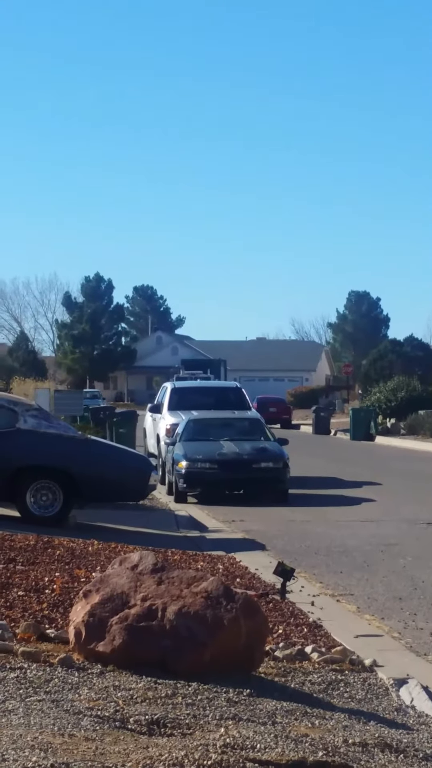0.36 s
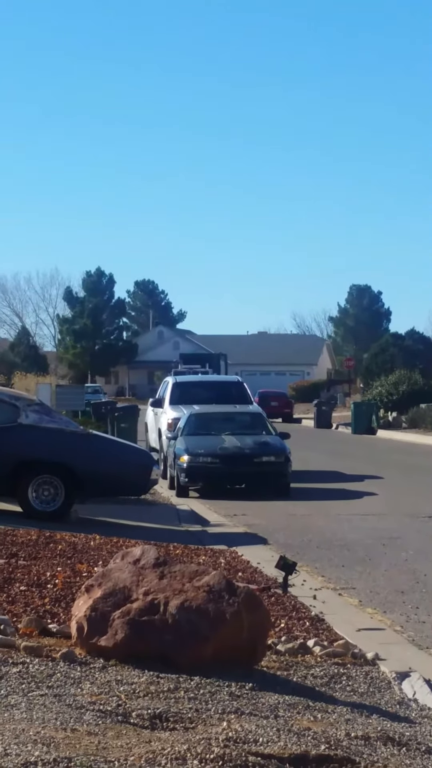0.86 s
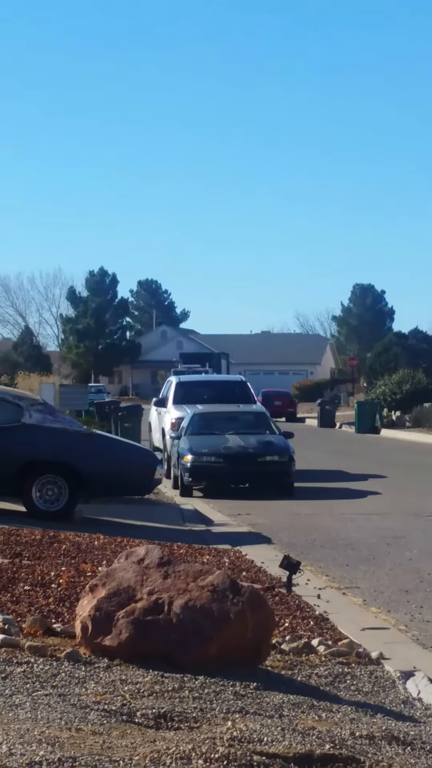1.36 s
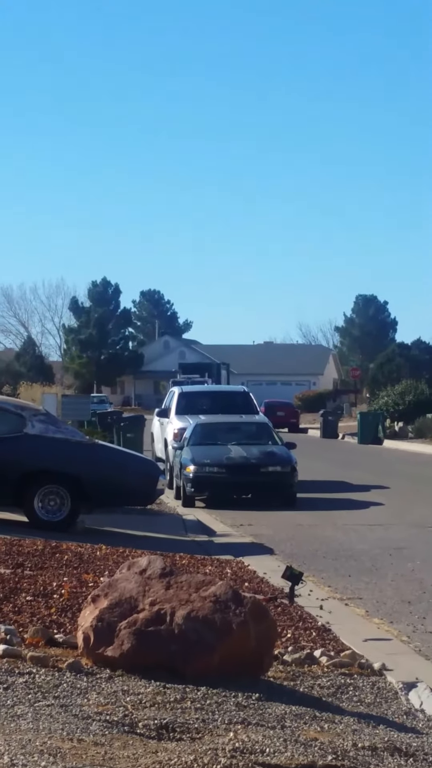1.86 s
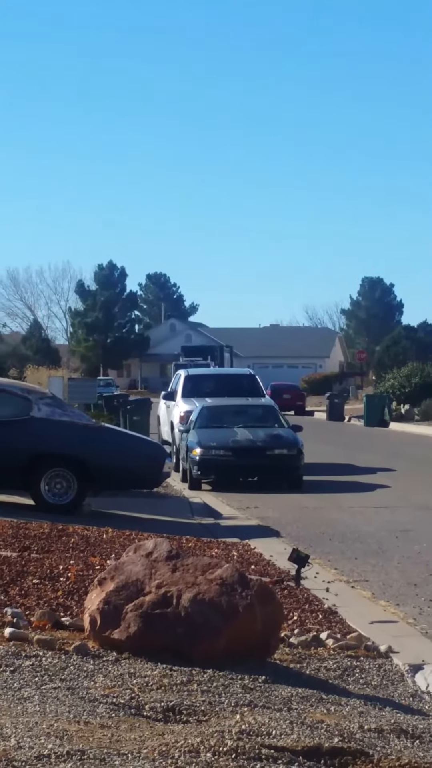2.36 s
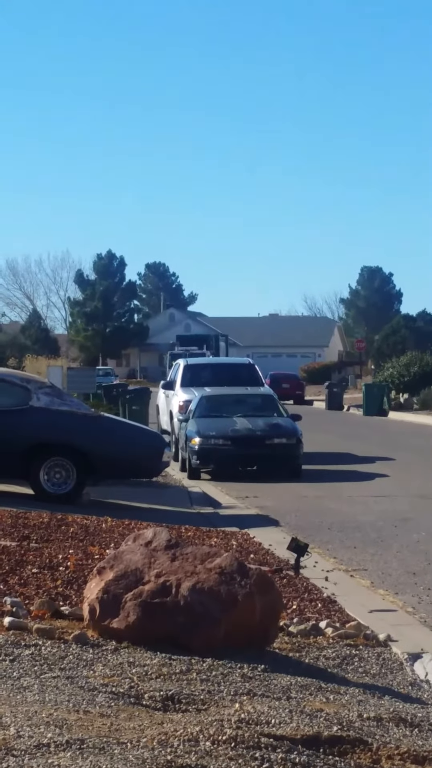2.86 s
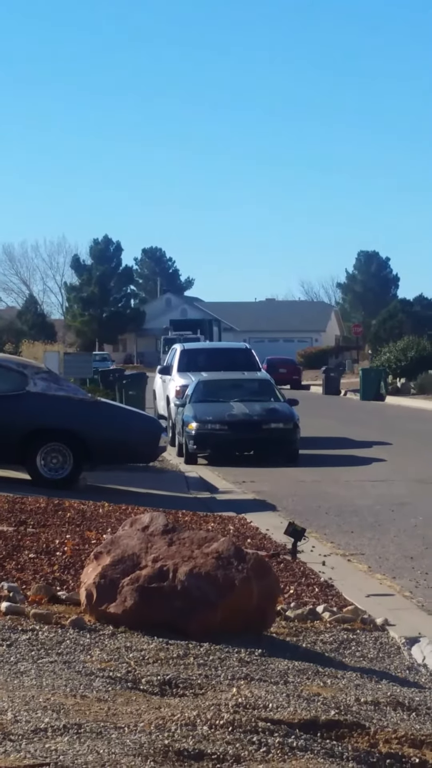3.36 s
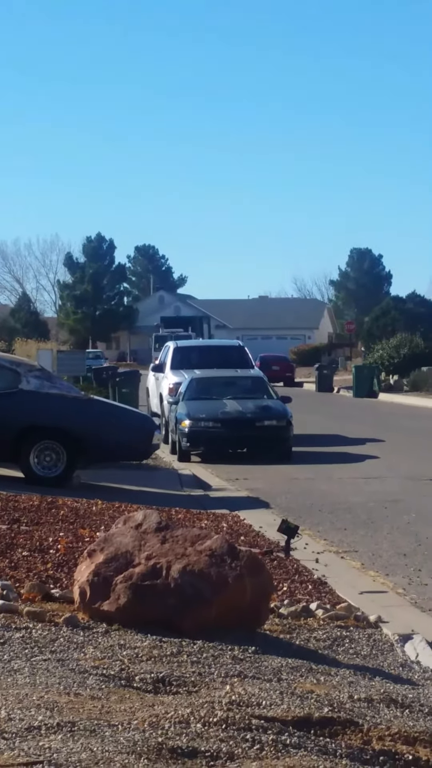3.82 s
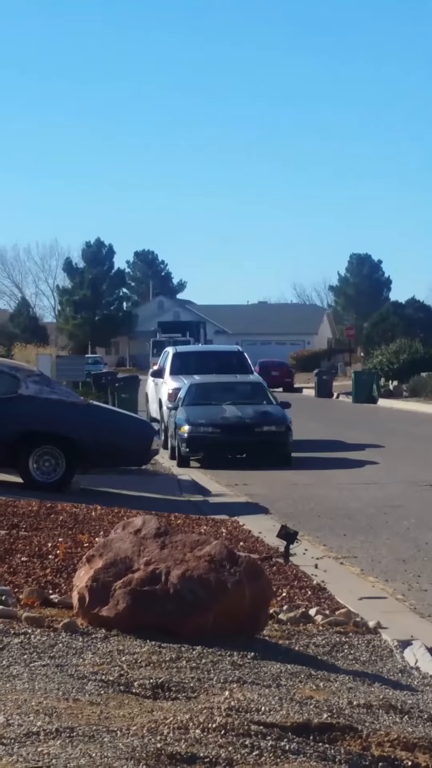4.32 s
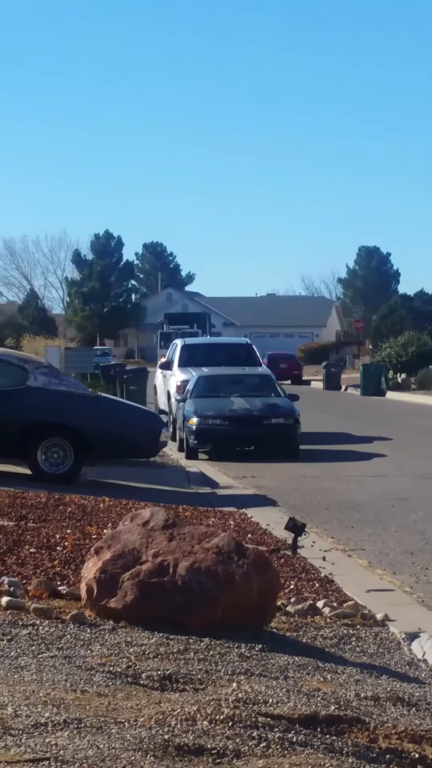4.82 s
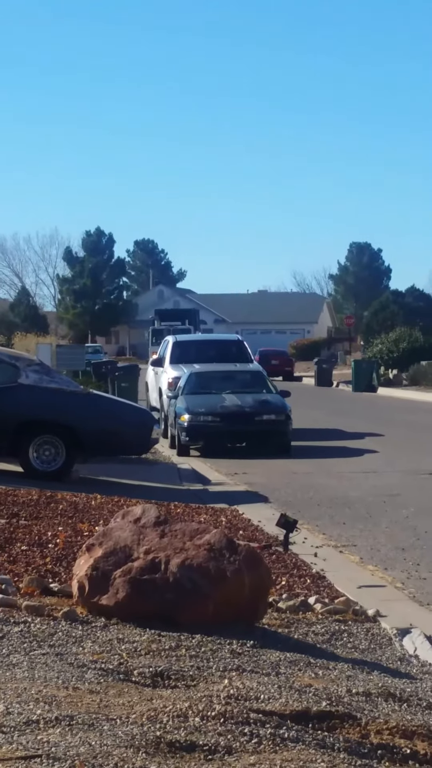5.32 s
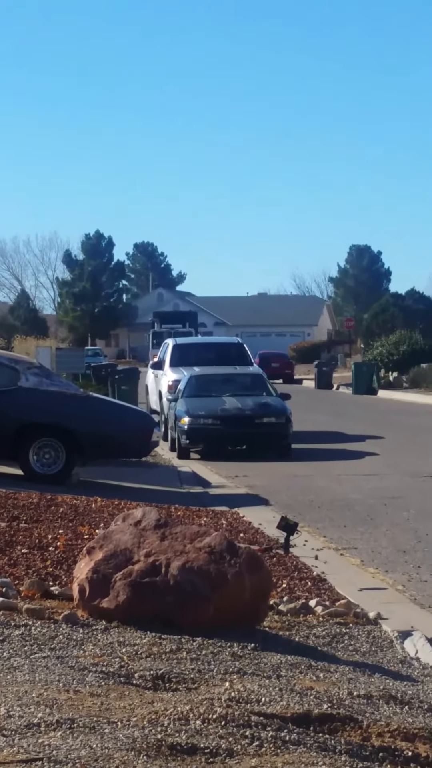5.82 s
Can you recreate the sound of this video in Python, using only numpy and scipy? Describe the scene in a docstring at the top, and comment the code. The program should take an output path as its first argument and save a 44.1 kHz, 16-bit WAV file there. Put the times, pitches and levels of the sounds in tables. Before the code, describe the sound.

Far-off diesel engine climbs from a low growl to a loud whining roar over five seconds, then drops back, with breeze buffeting the microphone.

```python
"""A heavy diesel truck revs up far down a residential street, over a low hum that soon dies away; then it eases off.
Gliding sines make its firing note and the gear-pump whine that follows the engine; shaped noise makes its roar.
A turbo adds thin whistles and a breathy whoosh. A light breeze, as low noise and short thumps, buffets the two
ports of a handheld microphone, whose left capsule hisses around 4 kHz; two faint ticks sound at the left."""
import sys
import numpy as np
from scipy import signal
from scipy.io import wavfile
from scipy.ndimage import uniform_filter1d

SR = 44100
rng = np.random.default_rng(int(sys.argv[2]) if len(sys.argv) > 2 else 0)


def unload_audio(sound):
    """Save the sound as a 16-bit wav file, at the path given as the first command line argument."""
    columns = np.transpose(np.atleast_2d(sound))
    # keep every value between -1 and 1, then stretch to whole-number steps
    steps = np.round(np.clip(columns, -1, 1) * 32767)
    wavfile.write(sys.argv[1], SR, steps.astype(np.int16))


def nominal_scale(level):
    """Amplitude ratio for a level in decibels (scalar or array-like)."""
    x = np.asarray(level, float) / 20
    return 10 ** x


N = 261954

# colour of the microphone hiss, mid and treble: (frequency [Hz], relative density [dB])
CAPSULE = [(1180, -53), (2000, -27.5), (2450, -19), (2970, -14.5), (3210, -13), (3710, -14), (3890, -4.5),
           (4260, -2.5), (4730, -10.5), (5250, -22.5), (6150, -33), (6740, -40.5), (10500, -33.5),
           (13600, -64), (22000, -120)]
TREBLE = [(8000, -46), (9500, -27.5), (10200, -13), (11300, -2.5), (12300, 4), (13800, 0), (15000, 2.5),
          (15500, 9), (15800, 3), (16000, -62)]
# lean of the capsule hiss to the left: (frequency [Hz], left minus right [dB])
CAPSULE_LEFT = [(1800, -3), (2740, 5), (3300, 13), (3900, 22), (4400, 23), (5500, 16), (7000, 3),
                (9800, -2)]
# faint ticks at the left port: (time [s], level [dB])
TICKS = [(.876, -43.5), (4.0, -54)]
# colour of the wind buffeting: (frequency [Hz], relative density [dB])
BUFFET = [(10, -6.5), (30, -0.5), (60, 2), (100, 11), (200, -22.5), (400, -52.5)]
# swells of the breeze: (time [s], half length [s], level [dB])
GUSTS = [(3.05, 0.45, -55), (3.669, .08, -48.5), (3.918, .14, -44), (4.496, 0.39, -56),
         (5.183, 0.35, -54.5)]
# eddies that thump one port: (time [s], level [dB], pitch [Hz], port [0 left, 1 right])
THUMPS = [(2.351, -35, 70.8, 0), (2.962, -30, 50, 0), (3.669, -29, 54.28, 0), (3.884, -16.5, 74.4, 0),
          (3.893, -16.5, 150, 1), (3.904, -21.5, 97, 1), (3.923, -19, 65.6, 0), (4.04, -16, 79, 0),
          (4.102, -14, 95.9, 1), (4.16, -21, 93.9, 0), (4.161, -19, 101, 1), (4.28, -28, 60, 1),
          (4.349, -25, 70, 1), (5.22, -36, 70, 1), (5.27, -28, 55.84, 0)]
# low hum at the start: (time [s], frequency [Hz], level [dB])
HUM = [(0, 237, -50), (.25, 230, -56), (.5, 226, -54), (.7, 224, -75)]
# turbo whistles: (start [s], length [s], first pitch [Hz], last pitch [Hz], level at full swell [dB])
TURBO = [(2.9, .8, 7100, 7800, -96), (3.72, .68, 7380, 8120, -87), (4.86, .68, 8815, 8810, -92),
         (5.52, .55, 8760, 8980, -91)]
# colour of the roar, low rumble and mechanical clatter: (frequency [Hz], relative density [dB])
RUMBLE = [(15, -36.5), (25, -6), (43, -10), (59, -1), (77, -4.5), (102, -3.5), (124, -5.5), (193, -6.5),
          (270, -6.5), (312, -8.5), (389, -15), (525, -36.5), (560, -33.5), (730, -48.5), (1230, -120)]
CLATTER = [(290, -32.5), (500, -1.5), (530, -5.5), (654, -1.5), (754, 0.5), (826, 0.5), (994, -4.5),
           (1170, -2), (1370, -9), (1930, -9), (2310, -12), (2670, -19.5), (3100, -24), (3580, -28),
           (3700, -28), (4810, -50.5), (8140, -120)]
# the truck's balance between the ports: (frequency [Hz], left minus right [dB])
TRUCK_LEFT = [(30, -2), (100, -1.5), (250, -1.5), (450, -5.5), (590, 5.5), (720, 1.5), (980, -4),
              (1300, 6.5), (1550, 0), (1780, -4.5), (2030, -2.5), (2400, -8.5), (2700, -4.5), (3500, 1),
              (4200, 22.5), (6000, 11.5), (7500, 9.5)]
# likeness of the roar at the two ports: (frequency [Hz], likeness [0 to 1])
TRUCK_SAME = [(30, .9), (100, 1), (270, 1), (500, 0.74), (1000, 0.98), (2000, 0.65), (3500, 1)]
# phase by which the left port leads: (frequency [Hz], lead [rad])
TRUCK_LEAD = [(60, -.05), (300, 0.35), (450, -.2), (600, 0.87), (860, -1.1), (1210, 1.99), (1500, .2),
              (2500, 1.37)]
# engine speed: (time [s], firing rate [firings per s])
SPEED = [(0.0, 36.24), (0.4, 37.81), (0.73, 39.28), (0.94, 43.65), (1.16, 46.2), (1.4, 48.47), (1.65, 50.8),
         (1.92, 53.66), (2.17, 55.88), (2.63, 59.4), (2.82, 61.1), (3.17, 66.03), (3.52, 71.1), (3.7, 73.2),
         (3.97, 75.26), (4.38, 79.92), (4.7, 83.4), (4.83, 83.63), (5.04, 75.24), (5.14, 71.13),
         (5.26, 69.1), (5.38, 67.57), (5.56, 66.8), (5.79, 67.74), (5.94, 67.8)]
# how hard the engine works and how openly it is heard: (time [s], load [dB], brightness [dB per octave])
EFFORT = [(0., 2.2, -6), (.4, 1.3, -7.5), (.75, 0.5, -6.5), (1.1, 1.2, -5), (1.4, 1.5, -3), (1.9, 1.4, -3),
          (2.3, .2, 1), (2.7, 0.8, 0), (3.2, -.7, 0.1), (3.6, -1.1, 1.3), (4.0, -1.1, 1.1),
          (4.4, -0.9, 2.2), (4.85, -0.9, 2), (5.1, -0.6, 1.2), (5.35, -0.35, -0.7), (5.94, 0.1, -5.5)]
# hydraulic pressure, which sets the strength of the whine: (time [s], level [dB])
PRESSURE = [(0., -9), (.45, -1.5), (1.0, .5), (1.9, 2), (2.8, 1.5), (3.5, .5), (3.9, 0), (4.5, 2),
            (4.85, 0.5), (5.1, 7), (5.4, -1), (5.94, -1.5)]
# pump multiples 1 to 8: (level at middle speed [dB], extra level [dB per octave of speed])
PUMP_MULTIPLES_DB = [(2, -5), (-15.5, 4.5), (-16, 2.5), (-20, 7.5), (-17.5, 3.5), (-25, 4), (-31, 0),
                     (-35, 4.5)]
# resonances that lift a pump tone gliding through them: (centre [Hz], width [Hz], lift [dB])
HOUSING = [(208, 22, 10.7), (233.2, 24, 11.4), (261.3, 24, 12.7), (297.8, 23, 5.5), (325.3, 45.5, 14),
           (354.4, 15, 7.5), (391.7, 13.6, 8.5), (456, 10, 3.3), (685, 55, 7.9), (754, 46, 11.2),
           (883, 140, 11.5), (1041, 59, 7.1), (1124, 48, 11), (1228, 51, 11), (1393, 62, 9.9),
           (1610, 66, 6), (1759.5, 130, 8.8), (1945, 130, 5.8), (2099, 74, 7.3), (2351, 160, 12.2),
           (2523, 100, 8.7), (2776, 80, 5.9)]
# how strongly the exhaust note comes through the roar: (time [s], level [dB])
BOOM = [(0., -0.5), (.6, 0), (1.2, 0), (2.0, 0.5), (2.7, 0.5), (3.0, -4), (3.4, 0.5), (3.7, -2), (3.85, 2),
        (4.0, -3), (4.3, 2), (4.75, -8.5), (5.04, 1.), (5.15, -4.5), (5.3, -2.5), (5.6, -2.5), (5.94, 3)]
# exhaust multiples: (level at middle speed [dB], extra level [dB per octave of speed])
EXHAUST_MULTIPLES_DB = [(-1, 2), (-12, -9), (-18.5, -9), (-21.5, -7.5)]
# resonances that lift an exhaust tone: (centre [Hz], width [Hz], lift [dB])
PIPE = [(46.6, 4, 1), (62, 6.1, 5), (67.9, 7.5, 6.5), (85.4, 12, 6.5), (121.5, 5.8, 9), (131.6, 13, 9),
        (141.8, 6, 13.5), (165.1, 20, 11.5), (186.3, 11, 12.5), (204, 8, 7.5), (213.5, 20, 8.5),
        (236, 40, 11.5), (273.7, 40, 22)]

# laws of engine speed: (value at middle speed, change per octave of speed, bend per octave squared)
MIDDLE_FIRINGS_PER_S = 60
CAPSULE_DB, TREBLE_DB = (-68, 0.7, -5), (-75.5, 2, -6.5)
RUMBLE_DB, CLATTER_DB = (-40.5, 12.5, -3.5), (-55.5, 15.5, 1.7)
RUMBLE_TILT_DB = (2.1, 3, 2.5)  # dB per octave of pitch
EXHAUST_DB, PUMP_DB = (-41, 8, -0.8), (-56.5, 11.5, 0.6)

EXHAUST_MULTIPLES = (1, 2, 3, 10 / 3)  # of the firing rate
TEETH_PER_FIRING = 5.27
OVERRUN_DB = -0.1178  # change of the fourth pump multiple per firing per s that the engine slows each second
WHISTLE_SWELL_DB, WHISTLE_PEAK_LATE = 11, 1.5  # exponent above 1: the peak falls past the middle
WHOOSH_DB, WHOOSH_PEAK_DB, WHOOSH_S, WHOOSH_WIDTH_S = -99.5, -85.5, 3.3, 0.6
TREBLE_BOOST_DB = 2.1  # the treble hiss swells with the turbo whoosh
CALM_DB = -62.5  # breeze between gusts

SIZE, HOP = 2048, 512  # short-time spectra [samples]
HZ = np.fft.rfftfreq(SIZE, 1 / SR)
FRAME_S = np.arange(N // HOP + 4) * HOP / SR


def read(points, hz):
    """Reads a spectrum table on a log-frequency axis."""
    f, value = np.transpose(points)
    return np.interp(np.log(hz + 1), np.log(f + 1), value)


def curves(rows, t):
    """The columns of a table at times t."""
    s, *columns = np.transpose(rows)
    return [np.interp(t, s, c) for c in columns]


def law(terms, t):
    """A value that follows engine speed."""
    octaves = np.log2(curves(SPEED, t)[0] / MIDDLE_FIRINGS_PER_S)
    return np.polyval(terms[::-1], octaves)


def lift(resonances, hz):
    """The dB that resonances add at a frequency."""
    return sum(db * np.exp(-(2 * (hz - centre_hz) / width) ** 2) for centre_hz, width, db in resonances)


def boost():
    """The rise and fall of turbo boost, 0 to 1."""
    return np.exp(-((FRAME_S - WHOOSH_S) / WHOOSH_WIDTH_S) ** 2)


def ports(left_db):
    """Gains of the two ports for a left-right level gap."""
    return nominal_scale(np.array([left_db / 2, -left_db / 2]))


def wobble(per_s):
    """Slow chance of rms 1."""
    length = int(SR / per_s)
    x = uniform_filter1d(uniform_filter1d(rng.standard_normal(N), length), length)
    return x / x.std()


def noise(shape_db, level_db, left_db=0 * HZ, same=0 * HZ, lead=0 * HZ, patchy_db=0.):
    """Random short-time spectra of a given shape, level in time and likeness between the ports."""
    a, b, c, d, patches = rng.standard_normal((len(FRAME_S), len(HZ), 5)).T
    patches = uniform_filter1d(uniform_filter1d(patches, size=8, axis=0), size=8, axis=1) * 8
    shape = nominal_scale(shape_db) * np.ones(a.shape)
    shape *= nominal_scale(level_db) / np.sqrt((shape ** 2).sum(0) * 2 / 3)
    same = np.clip(same, 0, 1)[:, None]
    left, other = a + 1j * b, c + 1j * d
    right = same * left + np.sqrt(1 - same ** 2) * other
    z = np.array([left * np.exp(1j * lead)[:, None], right])
    z *= shape * nominal_scale(patchy_db * patches) * ports(left_db)[:, :, None]
    return signal.istft(z, nperseg=SIZE, noverlap=SIZE - HOP)[1][:, :N]


def tone(hz, db, flutter_db, drift):
    """A gliding sine that wavers on its way down the street, as each port receives it."""
    angle = 2 * np.pi * (np.cumsum(hz) / SR + rng.random()) + drift * wobble(16)
    waves = np.sin([angle + read(TRUCK_LEAD, hz), angle])
    level = np.sqrt(2) * nominal_scale(db + flutter_db * wobble(30.0))
    return level * ports(read(TRUCK_LEFT, hz)) * waves


def capsule_hiss():
    """A hiss, peaked at the left port and in the treble, that rises a few dB with the revs."""
    # the treble also swells with the boost
    treble_db = law(TREBLE_DB, FRAME_S) + TREBLE_BOOST_DB * boost()
    mid = noise(read(CAPSULE, HZ)[:, None], law(CAPSULE_DB, FRAME_S), read(CAPSULE_LEFT, HZ), patchy_db=1.14)
    treble = noise(read(TREBLE, HZ)[:, None], treble_db, -1.1 + 0 * HZ, patchy_db=1.0)
    return mid + treble


def ticks(t):
    """Faint single ticks, coloured by the resonance of the left port."""
    out = np.zeros((2, N))
    for s, db in TICKS:
        u = np.clip(t - s, 0, 1)
        ring = np.sin(2 * np.pi * 4200 * u)
        ring += .3 * np.sin(2 * np.pi * 3400 * u)
        ring += .08 * np.sin(2 * np.pi * 13000 * u)
        out[0] += nominal_scale(db) * np.exp(-u / .0008) * ring
    return out


def wind(t):
    """Unrelated low buffeting at each port that swells in gusts, and single eddies that thump one port."""
    gusts = sum(nominal_scale(db) * np.exp(-((FRAME_S - s) / half) ** 2) for s, half, db in GUSTS)
    breeze = nominal_scale(CALM_DB) + gusts
    out = noise(read(BUFFET, HZ)[:, None], 20 * np.log10(breeze), patchy_db=2.8)
    for s, db, hz, port in THUMPS:
        u = (t - s) * hz
        out[round(port)] += nominal_scale(db) * np.exp(-(1.78 * u) ** 2) * np.sin(-2 * np.pi * u + 0.27)
    return out


def idle_hum(t):
    """A low hum, one gliding sine, that dies away as the revs start to climb."""
    return tone(*curves(HUM, t), flutter_db=2.0, drift=0.13)


def turbo(t):
    """A thin high whistle that comes and goes, over a breathy whoosh while the boost builds."""
    whoosh = -((HZ - 6000) / 500) ** 2
    whoosh_db = WHOOSH_DB + (WHOOSH_PEAK_DB - WHOOSH_DB) * boost()
    out = noise(whoosh[:, None], whoosh_db, 6.1 + 0 * HZ, patchy_db=4.0)
    for start, length, first_hz, last_hz, db in TURBO:
        u = np.clip((t - start) / length, 0, 1)
        swell_db = WHISTLE_SWELL_DB * (np.sin(np.pi * u ** WHISTLE_PEAK_LATE) - 1)
        sounding = uniform_filter1d(1. * (u > 0) * (u < 1), size=2000)
        hz = first_hz + (last_hz - first_hz) * u + 40 * wobble(200)
        out += sounding * tone(hz, db + swell_db, flutter_db=.5, drift=1.3)
    return out


def throb(t, depth=0.092):
    """Each firing jolts the drive, so pump and roar pulse at the firing rate."""
    return 1 + depth * np.cos(2 * np.pi * np.cumsum(curves(SPEED, t)[0]) / SR)


def roar():
    """Broadband engine noise: low rumble and mechanical clatter, tilted by engine speed and openness."""
    load_db, bright_db = curves(EFFORT, FRAME_S)
    pair = read(TRUCK_LEFT, HZ), read(TRUCK_SAME, HZ), read(TRUCK_LEAD, HZ)
    low_octaves = np.log2(np.clip(HZ, 150, 600) / 200)[:, None]
    high_octaves = np.log2(np.clip(HZ, 400, 4000) / 1200)[:, None]
    low = read(RUMBLE, HZ)[:, None] + law(RUMBLE_TILT_DB, FRAME_S) * low_octaves
    bright = read(CLATTER, HZ)[:, None] + bright_db * high_octaves
    rumble = noise(low, law(RUMBLE_DB, FRAME_S) + load_db, *pair, patchy_db=1.12)
    clatter = noise(bright, law(CLATTER_DB, FRAME_S) + load_db, *pair, patchy_db=1.0)
    return rumble + clatter


def pump(t):
    """Gear teeth mesh in step with the engine; multiples swell at resonances, upper ones dull as revs fall."""
    firing_hz = curves(SPEED, t)[0]
    hz, pressure_db = TEETH_PER_FIRING * firing_hz, curves(PRESSURE, t)[0]
    slowing = np.maximum(-uniform_filter1d(np.gradient(firing_hz) * SR, size=4000), 0)
    out = np.zeros((2, N))
    for k, terms in enumerate(PUMP_MULTIPLES_DB, 1):
        level_db = law(PUMP_DB, t) + law(terms, t) + pressure_db + lift(HOUSING, k * hz)
        level_db += OVERRUN_DB * slowing * np.log2(k) / 2
        out += tone(k * hz, level_db, flutter_db=2.37, drift=.15 * k)
    return out


def exhaust(t, uneven_db=-10.0):
    """The firing note and its multiples; unequal cylinders add weaker multiples of the shaft speed."""
    hz, load_db = curves(SPEED, t)[0], curves(EFFORT, t)[0]
    out = np.zeros((2, N))
    for k, terms in zip(EXHAUST_MULTIPLES, EXHAUST_MULTIPLES_DB):
        level_db = law(EXHAUST_DB, t) + law(terms, t) + curves(BOOM, t)[0] + lift(PIPE, k * hz)
        out += tone(k * hz, level_db, flutter_db=1.2, drift=.15 * k)
    rumble_db = law(RUMBLE_DB, t) + load_db
    for k in (7, 8, *range(11, 23)):
        shaft = k * hz / 3  # three firings per shaft turn
        level_db = rumble_db + uneven_db + read(RUMBLE, shaft) + 3 * wobble(3)
        out += tone(shaft, level_db, flutter_db=2.5, drift=0.59)
    return out


def scene():
    """Truck, wind and ticks at the two ports."""
    t = np.arange(N) / SR
    truck = exhaust(t) + throb(t) * (pump(t) + roar()) + idle_hum(t) + turbo(t)
    return truck + wind(t) + ticks(t)


def top_cut(x):
    """Nothing passes above the cut-off."""
    return signal.sosfilt(signal.butter(12, 15910, fs=SR, output="sos"), x)


def record(dry):
    """The microphone adds its hiss to the scene; both ends are softened."""
    soft_ends = signal.windows.tukey(N, .002)
    mix = (dry + capsule_hiss()) * soft_ends
    return top_cut(mix)


dry = scene()
out = record(dry)
unload_audio(out)
```